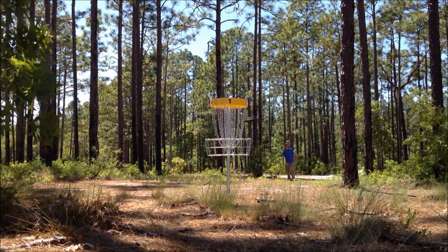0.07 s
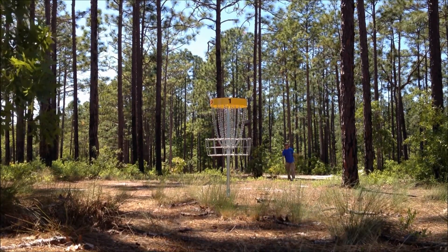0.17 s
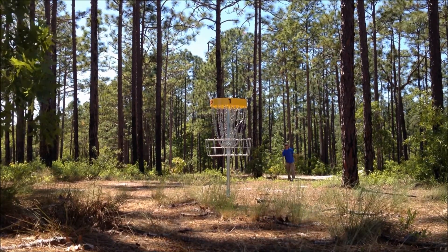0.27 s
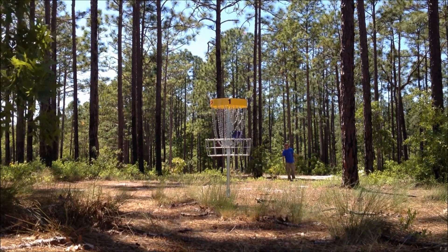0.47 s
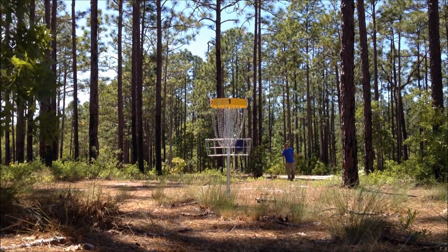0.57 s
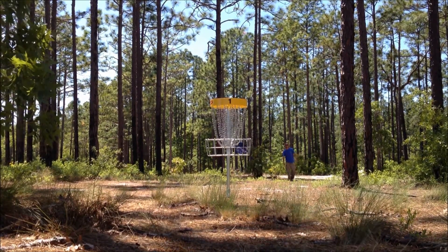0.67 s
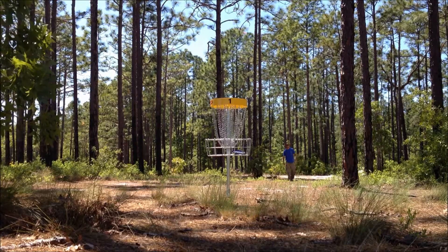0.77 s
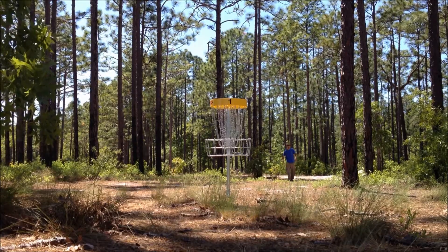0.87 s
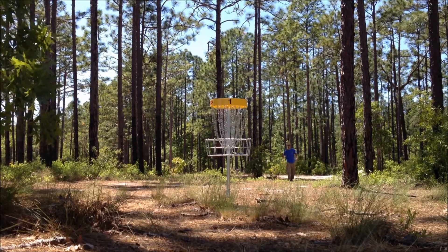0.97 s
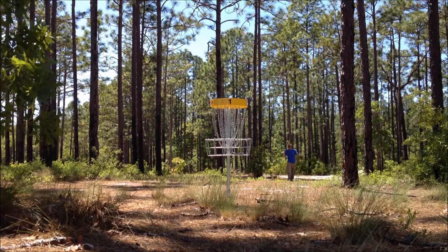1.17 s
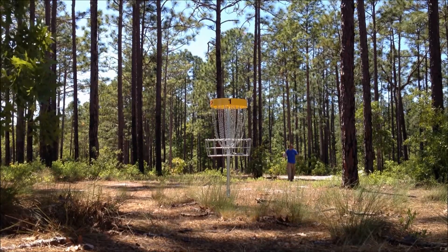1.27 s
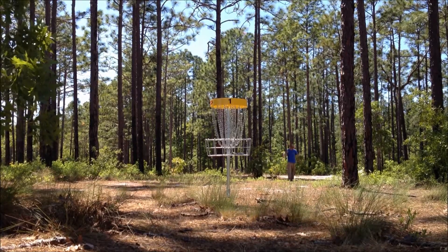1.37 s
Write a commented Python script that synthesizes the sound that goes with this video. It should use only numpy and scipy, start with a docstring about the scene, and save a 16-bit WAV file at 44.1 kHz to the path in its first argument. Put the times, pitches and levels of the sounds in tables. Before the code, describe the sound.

Steel chains crash and jingle as a thrown disc lands in a disc golf basket.

```python
"""A crash of steel chains, then a fading jingle: a thrown disc hits a disc golf basket and drops
into the tray. The chains swing back and clash again and again, ever weaker; each clash is a shower
of contacts that ring the links and the wire cage. The plastic knocks, the jolted frame rings on.
Around it a quiet pine wood: a small bird, soft air, and a light breeze bumping the microphone."""
import sys
import numpy as np
from scipy import signal
from scipy.fft import rfft, irfft, next_fast_len
from scipy.io import wavfile
from scipy.ndimage import uniform_filter1d

SR = 44100
rng = np.random.default_rng(int(sys.argv[2]) if len(sys.argv) > 2 else 0)


def store_pcm(level_fs):
    """Save levels as 16-bit WAV."""
    pcm = np.round(np.clip(level_fs, -1, 1) * 32767).astype(np.int16)
    wavfile.write(sys.argv[1], SR, np.atleast_2d(pcm).T)


N = 61739
FFT_SIZE = 2 * next_fast_len(N)
HIT_S, SWAY_RISE_S = 0.2152, 0.011  # the disc lands and sets the chains swinging


def amp(db):
    """Decibels to gain."""
    return 10 ** (np.asarray(db) / 20)


def unit(x):
    """Scaled to rms 1."""
    return x / np.sqrt(np.mean(x ** 2) + 1e-20)


def along(points, hz):
    """A curve through (Hz, value) points, read on a log frequency axis."""
    freqs, values = np.transpose(points)
    return np.interp(np.log(hz + 1), np.log(freqs + 1), values)


def clock():
    """Time of every sample in seconds."""
    return np.arange(N) / SR


def colour(x, points):
    """Minimum-phase EQ through (Hz, dB) points."""
    cepstrum = irfft(np.log(amp(along(points, np.fft.rfftfreq(FFT_SIZE, 1 / SR)))))
    cepstrum[1:FFT_SIZE // 2] *= 2
    cepstrum[FFT_SIZE // 2 + 1:] = 0
    return irfft(rfft(x, FFT_SIZE) * np.exp(rfft(cepstrum)), FFT_SIZE)[:N]


def even(x, seconds):
    """Leveller: rms held near 1 over the given time; faster beating stays."""
    power = np.abs(uniform_filter1d(unit(x) ** 2, size=max(int(seconds * SR), 1)))
    return x / np.sqrt(power + 0.09) / np.std(x)


def burst(start, rise, t60):
    """Envelope: linear attack, exponential decay."""
    t = clock() - start
    return np.clip(t / rise, 0, 1) * np.exp(-np.log(1000) * np.maximum(t - rise, 0) / t60)


def mode(hz, t60, size=16000):
    """A damped sine of energy 1."""
    t = np.arange(size) / SR
    ring = np.sin(2 * np.pi * hz * t) * np.exp(-np.log(1000) * t / t60)
    return ring / np.linalg.norm(ring)


def air(level_db=-60.5):
    """The bed: a steady hush of trees."""
    # EQ of the hush: f/Hz, level/dB
    hush_eq = [(30, -26), (200, -3.5), (450, -2.5), (770, -0.5), (1400, -11.5), (3000, -16.5), (6500, -18),
               (10000, -28), (15000, -20.5)]
    return amp(level_db) * unit(colour(rng.standard_normal(N), hush_eq))


def breeze(trim_db=-3.5):
    """Wind bumps the microphone in short swells of low rumble."""
    # EQ of the rumble: f/Hz, level/dB
    rumble_eq = [(25, -66), (50, -16.5), (100, 0), (160, 3.5), (230, -6.5), (400, -24.5), (1000, -69)]
    # envelope of the bumps before the trim: t/s, level/dB
    bumps = [(0.0, -62), (0.08, -60.5), (0.116, -55.5), (0.178, -66), (0.232, -62), (0.322, -59),
             (0.368, -51.5), (0.428, -62), (0.49, -52), (0.532, -61.5), (0.594, -44.5), (0.63, -49.5),
             (0.664, -59), (0.692, -50.5), (0.82, -65), (0.844, -43), (0.86, -52), (0.902, -66),
             (0.964, -60), (0.992, -48), (1.02, -41), (1.034, -51), (1.054, -62), (1.074, -51),
             (1.098, -49.5), (1.128, -75), (1.182, -81), (1.214, -43.5), (1.242, -70), (1.288, -48.5),
             (1.382, -42), (1.4, -69)]
    rumble = even(colour(rng.standard_normal(N), rumble_eq), seconds=0.031)
    return rumble * amp(trim_db + np.interp(clock(), *np.transpose(bumps)))


def bird(glide=2.3):
    """Thin notes that sweep up and down in turn, each over `glide` time constants."""
    # notes: t/s, length/s, start f/Hz, target f/Hz, level/dB
    chirps = [(-.004, 0.022, 5070, 7450, -70), (.064, 0.029, 7070, 4880, -63.5),
              (0.095, 0.049, 5270, 7500, -67.5), (0.18, 0.025, 7100, 4950, -62)]
    song = np.zeros(N)
    for start, length, from_hz, to_hz, db in chirps:
        progress = np.clip((clock() - start) / length, 0, 1)
        hz = to_hz + (from_hz - to_hz) * np.exp(-glide * progress)
        song += amp(db) * np.sin(np.pi * progress) * np.sin(2 * np.pi * np.cumsum(hz) / SR)
    return song


def trunks(x):
    """Diffuse echo from the trees; the upper mids hang on longest."""
    # decay of the wood: f/Hz, t60/s
    decay_times = [(200, 1.8), (1000, 0.4), (2800, 4.6), (6000, 1.1), (14000, 0.58)]
    hz, t, noise = signal.stft(rng.standard_normal(N), SR, nperseg=256)
    decay = np.exp(-np.log(1000) * t / along(decay_times, hz)[:, None])
    tail = signal.istft(noise * decay, SR, nperseg=256)[1]
    return signal.fftconvolve(x, tail / np.linalg.norm(tail))[:N]


def disc(slap_db=9, slap_hz=2600):
    """The disc knocks on chains, pole and tray: a hollow plastic body under a dull slap."""
    # knocks: t/s, peak level/dB
    knocks = [(0.251, -29.5), (0.257, -27), (0.2583, -33.5), (.2645, -32.5), (0.2735, -37), (0.28, -38),
              (0.4, -34), (.438, -39.5), (.548, -38.5), (0.646, -37.5)]
    # modes of the plastic: f/Hz, relative level/dB, t60/s
    plastic_modes = [(268, 0.5, 0.029), (328, -6, 0.065), (433, -0.5, 0.044), (592, 0, 0.035),
                     (898, 4, 0.067), (1150, 1.5, 0.021), (1450, 8.5, 0.0086)]
    lowpass = signal.butter(2, slap_hz, fs=SR)
    track = np.zeros(N)
    for start, peak_db in knocks:
        body = np.zeros(N)
        for hz, db, t60 in plastic_modes:
            gain = amp(db + rng.normal(0, 4.3)) * rng.choice([-1, 1])
            body += gain * np.sin(2 * np.pi * hz * (clock() - start)) * burst(start, 0.00024, t60)
        dull_noise = unit(signal.lfilter(*lowpass, rng.standard_normal(N)))
        knock = body + amp(slap_db) * dull_noise * burst(start, rise=0.00067, t60=0.022)
        track += amp(peak_db) * knock / np.abs(knock).max()
    return track


def frame(count=400, low_hz=1334, high_hz=4388):
    """The first blow jolts the crowded modes of pole and tray: a hard crash, a long faint ring."""
    hz = low_hz * (high_hz / low_hz) ** rng.random(count)
    bins = np.round(hz * FFT_SIZE / SR).astype(int)
    spectrum = np.zeros(FFT_SIZE // 2 + 1, complex)
    spectrum[bins] = rng.standard_normal(count) * np.exp(2j * np.pi * rng.random(count))
    crash = amp(-35) * burst(HIT_S, rise=0.00049, t60=0.22)
    afterring = amp(-56.5) * burst(HIT_S, rise=0.001, t60=10.85)
    return unit(irfft(spectrum)[:N]) * np.hypot(crash, afterring)


def contacts(per_s, scatter_db=5.5):
    """Random clicks of uneven size, rms 1."""
    chance, size, sign = rng.random(N), rng.standard_normal(N), rng.choice([-1, 1], N)
    return unit((chance < per_s / SR) * sign * amp(scatter_db * np.tanh(size / 2) * 2))


def agitation(layer, sway_db):
    """One layer's envelope, how hard the links collide: clashes on top of the fading sway."""
    # chain clashes: t/s, rise/s, t60/s, clatter level/dB, ring level/dB, shimmer level/dB
    clashes = [ (.2150, .0015, 0.39, -27.5, -34, -39), (0.219, 0.0018, 0.06, -26, -27, -43),
               (0.249, 0.003, 0.47, -35, -29, -27.5), (.282, 0.0014, 0.047, -51, -24.5, -29),
               (.291, .002, 0.025, -45, -40, -26), (0.338, 0.0017, 0.22, -42, -42, -29.5),
               (0.367, .015, 0.049, -53, -27.5, -35), (0.396, 0.003, .16, -64, -31, -33),
               (0.487, .004, 0.18, -63, -56, -35), (0.545, 0.0035, 0.025, -61, -31.5, -39),
               (0.55, 0.012, 0.089, -40, -32, -34.5), (0.576, 0.0022, 0.52, -48, -43, -37.5),
               (0.687, 0.0085, 0.23, -33.5, -33.5, -39.5), (0.726, .003, 0.15, -37.5, -47, -38),
               (.795, 0.0081, 0.6, -48, -72, -46), (0.883, 0.024, 0.11, -48, -50.5, -38),
               (1.012, .02, 0.28, -48.5, -45, -46), (1.093, 0.0033, 0.099, -51, -44, -60),
               (1.124, 0.0031, 0.3, -67, -44, -50), (1.142, 0.0023, 0.085, -44.5, -46, -43),
               (1.188, .003, .08, -56, -48, -48), (1.3053, 0.00028, 0.028, -44, -32.5, -38),
               (1.309, 0.0023, 0.23, -51.5, -47, -48), (1.346, 0.0055, 0.4, -57, -56, -49.5),
               (1.374, 0.0051, 0.068, -49.5, -50, -51)]
    column = {"clatter": 3, "ring": 4, "shimmer": 5}[layer]
    clash_power = sum((amp(row[column]) * burst(*row[:3])) ** 2 for row in clashes)
    sway = amp(sway_db) * burst(HIT_S, SWAY_RISE_S, t60=2.87)
    return np.sqrt(clash_power + sway ** 2)


def clatter(cage_modes=320, cage_db=-8.5, low_hz=2951, high_hz=9646):
    """Dense bare clicks of steel on steel, which also ring the many weak modes of the wire cage."""
    # EQ of the bare contacts: f/Hz, level/dB
    click_eq = [(150, -37.5), (500, -15), (1200, -14.5), (1900, -19.5), (2600, -3.5), (3800, -4), (5200, 1),
                (7200, 2), (8800, 2), (10000, -6), (11200, -3.5), (13700, 9), (14300, -21), (15500, -34)]
    clicks = unit(colour(contacts(per_s=4100), click_eq)) * agitation("clatter", sway_db=-38.5)
    freqs = rng.uniform(low_hz, high_hz, cage_modes)
    gains = rng.uniform(-0.81, 1, cage_modes)
    cage = sum(gain * mode(hz, t60=0.24) for hz, gain in zip(freqs, gains))
    return clicks + amp(cage_db) * signal.fftconvolve(clicks, cage / np.linalg.norm(cage))[:N]


def clinks(twin_gap_hz=72, twin_db=-8):
    """Single links ring out; each is slightly asymmetric, so a twin mode just above makes it beat."""
    # accents: t/s, f/Hz, main mode level/dB, rise/s, t60/s
    accents = [(.333, 1755, -40.5, 0.0094, 0.18), (.374, 4719, -23.5, 0.0081, 0.3),
               (.5458, 4760, -25.5, .002, 0.011), (.554, 4797, -31, 0.014, 0.11),
               (0.6554, 4900, -29.5, 0.00048, .016), (.688, 4760, -33.5, 0.0016, 0.087),
               (1.127, 4733, -45, .005, 0.3), (1.3043, 4800, -38, 0.00085, 0.15)]
    track = np.zeros(N)
    for start, hz, db, rise, t60 in accents:
        t = clock() - start
        twin_hz = hz + twin_gap_hz * rng.uniform(0.666, 1.28)
        pair = np.sin(2 * np.pi * hz * t) + amp(twin_db) * np.sin(2 * np.pi * twin_hz * t)
        track += amp(db) * burst(start, rise, t60) * pair
    return track


def links(modes, spread=0.0011):
    """Steady jingle: per mode a lead link and two weaker, detuned ones, each with its own contacts."""
    jingle = np.zeros(N)
    for hz, db, t60 in modes:
        for detune, share in [(0, 1), (-spread, 0.5), (spread, 0.5)]:
            ring = mode(hz * (1 + detune * rng.uniform(0.44, 1.6)), t60)
            jingle += amp(db) * share * unit(signal.fftconvolve(contacts(per_s=500), ring)[:N])
    return even(jingle, seconds=0.037)


def chains():
    """Colliding links in three registers: a clang struck by the disc, a ring, a shimmer on top."""
    # low, middle and high link modes: f/Hz, relative level/dB, t60/s
    clang_modes = [(1715, -4.5, 0.29), (1752, 3.5, 0.16), (1758, -2.5, 0.037), (1821, -1, 0.03),
                   (2106, 1.5, 0.011)]
    ring_modes = [(4725, -3, 0.21), (4733, 0, 0.1), (4830, 2, 0.17), (4785, 2, 0.036), (5290, -12, 0.04),
                  (5050, -2.5, 0.12), (5110, -3.5, 0.016), (8760, -16, 0.0073)]
    shimmer_modes = [(11620, 4.5, 0.094), (11830, 7, 0.067), (11790, 6, 0.13), (12330, 1, 0.041),
                     (13000, -4, 0.051), (12500, -3, 0.061), (12300, 7, 0.064), (12000, -21, 0.0054),
                     (12200, -4, 0.057), (12900, -17, 0.023), (13800, -23, .05)]
    strike = amp(-33) * burst(HIT_S, SWAY_RISE_S, t60=0.36)
    sway = amp(-50) * burst(HIT_S, SWAY_RISE_S, t60=5.9)  # keeps the clang alive
    clang = links(clang_modes) * np.hypot(strike, sway)
    ring = links(ring_modes) * agitation("ring", sway_db=-42.5)
    shimmer = links(shimmer_modes) * agitation("shimmer", sway_db=-34.5)
    return clang + ring + shimmer


def scene(low_cut_hz=216, echo_db=-16.5):
    """Mono mix: basket and bird echo among the trees, over air and breeze."""
    low_cut = signal.butter(3, low_cut_hz, 'high', fs=SR)  # basket and disc sound with little bass
    basket = signal.lfilter(*low_cut, chains() + clinks() + clatter() + frame() + disc())
    direct = basket + bird()
    return (direct + amp(echo_db) * trunks(direct) + air() + breeze())[None]


def record(dry, top_hz=15500):
    """Brick-wall high cut on the whole mix."""
    passband = np.fft.rfftfreq(FFT_SIZE, 1 / SR) < top_hz
    return irfft(rfft(dry, FFT_SIZE) * passband, FFT_SIZE)[:, :N]


dry = scene()
out = record(dry)
store_pcm(out)
```